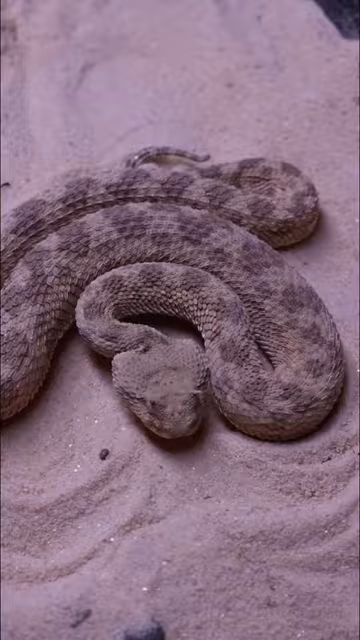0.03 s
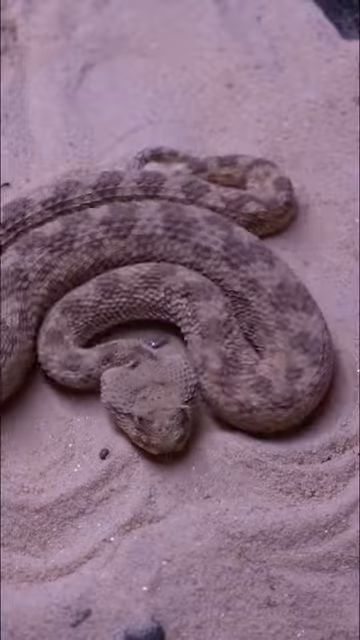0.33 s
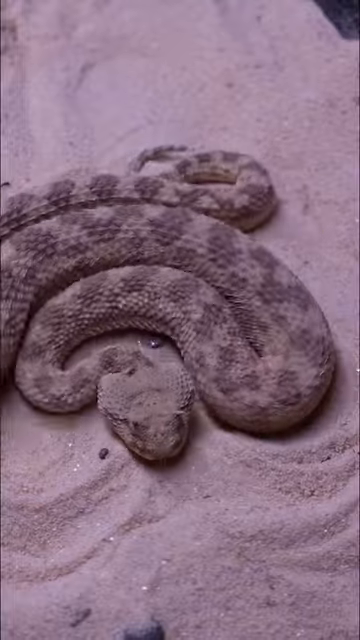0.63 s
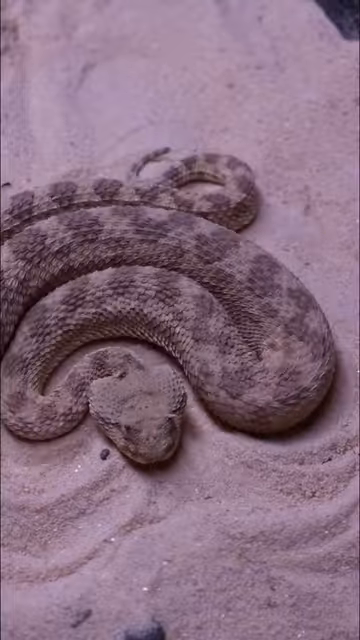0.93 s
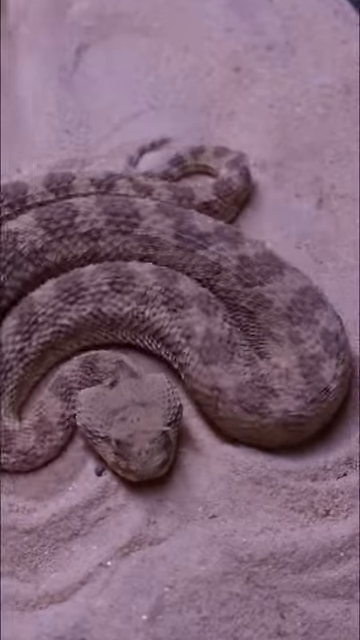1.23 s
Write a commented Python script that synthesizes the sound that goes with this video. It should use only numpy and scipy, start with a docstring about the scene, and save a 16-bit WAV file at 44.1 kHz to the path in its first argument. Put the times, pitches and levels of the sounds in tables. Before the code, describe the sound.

Very close, a snake's scales scrape against each other in a steady dry sizzle. It softens, a small bump sounds, and later the rubbing suddenly grows louder. The small enclosure rings slightly, with a faint low hum underneath.

```python
"""A bright sizzle and a rasp, very close: a viper on sand rubs its coils together in a small enclosure.
Its ridged scales catch on each other thousands of times a second, and these tiny clicks make the
hollow of the enclosure ring. The rubbing eases off, then picks up sharply near the three-second mark.
Underneath lie a few soft bumps, one dull scuff of a coil, a faint mains hum and low room noise."""
import sys
import numpy as np
from scipy import signal
from scipy.fft import rfft, irfft
from scipy.io import wavfile
from scipy.ndimage import uniform_filter1d

SR = 44100
rng = np.random.default_rng(int(sys.argv[2]) if len(sys.argv) > 2 else 0)


def pcm_store(signal):
    """Save signal as 16-bit PCM."""
    levels = np.round(np.clip(np.atleast_2d(signal), -1, 1) * 32767)
    wavfile.write(sys.argv[1], SR, levels.astype(np.int16).T)


N = 176400

# How hard the snake rubs: time_s, sizzle_db, rasp_db, hollow_db
RUB_EFFORT = [(0.04, -29, -35, -27.5), (0.3, -29, -36.5, -29.3), (0.46, -32, -36.5, -29),
              (0.8, -32.5, -38.5, -30), (1.15, -31.5, -37, -31.5), (1.32, -32, -39, -31.5),
              (1.5, -36, -38.5, -32), (2.05, -36.3, -39.5, -35), (2.4, -35.5, -40, -36),
              (2.81, -35.5, -39.5, -33.5), (2.98, -24.5, -33, -27.5), (3.2, -27.5, -35, -28.5),
              (3.42, -26.5, -33.5, -29), (3.86, -23.5, -31, -26), (4.0, -25.5, -31.5, -27.3)]
# How much the higher ringing stands out: time_s, level_db
HIGH_RING_LEVELS = [(0.04, -46), (0.1, -38.5), (0.2, -43.5), (0.32, -42), (0.45, -51), (0.72, -44.5),
                    (0.95, -55.5), (2.8, -48), (3.1, -42.5), (3.44, -36), (4.0, -35.5)]
JUDDER_HZ, JUDDER_DB, SWAY_HZ, SWAY_DB = 88, 0.51, 6.6, 0.5  # fast and slow wobble of the grip


def rubbing_coils(t):
    """Sliding coils sizzle, rasp and ring the enclosure; one uneven grip shakes all their levels."""
    times, *levels = np.array(RUB_EFFORT).T
    sizzle_gain, rasp_gain, hollow_gain = (undb(np.interp(t, times, db)) for db in levels)
    high_gain = undb(np.interp(t, *np.array(HIGH_RING_LEVELS).T))
    grip = undb(JUDDER_DB * wobble(JUDDER_HZ) + SWAY_DB * wobble(SWAY_HZ))
    scraping = sizzle(t) * sizzle_gain + rasp(high_gain) * rasp_gain
    ringing = hollow_ring(t) * hollow_gain + high_ring() * high_gain + boom() * rasp_gain
    return grip * (scraping + ringing)


def catches(per_second=10000, spread_db=2):
    """Two streams of random clicks, one click each time a scale catches."""
    hits = rng.random((2, N)) < per_second / SR
    direction = np.sign(rng.standard_normal((2, N)))
    strength = undb(spread_db * rng.standard_normal((2, N)))
    return unit(hits * direction * strength)


# The tone of the sizzle: pitch_hz, level_db
SIZZLE_TONE = [(4000, -23.5), (6500, -10.5), (8000, -10), (10100, -5.5), (10900, -2.5), (11400, 0),
               (11950, -1), (12300, -6), (12700, 1), (13700, -4), (14800, -22), (15800, -42)]


def sizzle(t):
    """The bright side of the clicks; it drifts left as the rubbing spot moves."""
    clicks = wall_echoes(stereo(catches(), likeness=0.18), level_db=-5.5)
    return shape_tone(clicks, SIZZLE_TONE) * undb(1.5) * pan(0.9 + 0.4 * t)


# The tone of the rasp: pitch_hz, level_db
RASP_TONE = [(100, -25), (180, -18), (260, -7.5), (340, 7), (480, 2), (560, 1.5), (900, 5.5), (1350, 4.5),
             (1680, 1.5), (2350, 1.5), (2650, -1.5), (2950, 2.5), (4000, -1.5), (4700, -0.5), (6400, -2),
             (9000, -3), (14000, -3.5)]


def rasp(high_gain):
    """The lower, rougher side of the clicks; a dip in its treble deepens as the high ringing grows."""
    clicks = wall_echoes(stereo(catches(), likeness=0.67), level_db=-3.5)
    rough = shape_tone(clicks, RASP_TONE) * undb(3.5)
    dip_depth = 0.6 * np.sqrt(high_gain / high_gain.max())
    return rough - dip_depth * ring(rough, hz=3030, width_hz=990)


# The enclosure's notes: pitch_hz, base_width_hz, level_db, likeness (of left and right, -1 to 1)
HOLLOW_NOTES = [(674.3, 58, -1, 1), (743.8, 35.3, 1, 0.92), (793, 110, -9.5, 0.97), (908.4, 50, -5.5, 0.58),
                (1001, 47, -8.5, 0.8), (1076, 47, -5, 0.66), (1233, 35, -9, 0.3), (1544, 30, -15, -0.79)]
# Brief swells of the hollow ringing: peak_s, half_length_s, rise_db
RING_SWELLS = [(0.401, 0.014, 4), (0.714, .02, 4.5), (0.96, 0.0099, 7.5), (1.101, 0.0065, 8),
               (1.144, 0.012, 4.5), (2.883, 0.012, 6), (2.96, 0.019, 1.5), (3.138, .014, 5.5)]


def hollow_ring(t):
    """The clicks ring the hollow of the enclosure; now and then the ringing swells briefly."""
    notes = sum(undb(db) * ringing_note(hz, base_width * 1.55, likeness)
                for hz, base_width, db, likeness in HOLLOW_NOTES)
    swell_db = sum(db * np.exp(-((t - peak) / half) ** 2) for peak, half, db in RING_SWELLS)
    return unit(notes) * undb(swell_db)


# The enclosure's higher notes: pitch_hz, width_hz, level_db, likeness
HIGH_NOTES = [(1895, 168, -0.5, 0.2), (2280, 210, -6, -0.37)]


def high_ring():
    """The clicks also ring higher notes, heard when the rubbing is hard."""
    return sum(undb(db) * ringing_note(hz, width, likeness) for hz, width, db, likeness in HIGH_NOTES)


def boom():
    """The clicks faintly ring the enclosure's lowest note."""
    return ringing_note(hz=180, width_hz=64, likeness=0.79) * undb(-21)


def ringing_note(hz, width_hz, likeness):
    """One breathy note, kept ringing by a stream of catches."""
    return unit(ring(stereo(catches(), likeness), hz, width_hz))


def wall_echoes(sound, level_db, first_s=0.0004, decay_s=0.021):
    """Sand and near walls return the sound within milliseconds, differently to each side."""
    age = np.arange(2048) / SR
    scatter = rng.standard_normal((2, len(age))) * np.exp(-age / decay_s) * (age > first_s)
    paths = (age == 0) + undb(level_db) * scatter / np.linalg.norm(scatter, axis=1, keepdims=True)
    return signal.fftconvolve(sound, paths, axes=1)[:, :N]


# Soft bumps: start_s, relative_level_db, contact_s, tick_db (compared with the thud)
SOFT_BUMPS = [(1.015, -7, 0.0011, -30), (1.0557, -1.5, 0.0013, -1), (1.0585, 4, 0.0007, -4),
              (1.0628, -8, 0.0039, -5), (2.1975, -8, 0.002, -30), (2.662, -17, 0.0019, -30)]
# The notes a bump rings: pitch_hz, fade_s (time to fall 60 dB), level_db
THUD_NOTES = [(190, .04, -19), (313, 0.037, -2.5), (510, 0.0058, -3), (700, 0.054, 4), (910, 0.022, 6.5),
              (1610, 0.028, 3), (2700, .03, 13)]
BUMP_DB, THUD_PAN_DB, TICK_DECAY_S = -18, -11, 0.0047


def bumps(t):
    """Soft pushes thud on the right; a shorter contact is brighter, and some add a gritty tick."""
    out = np.zeros((2, N))
    body = sum(undb(db) * np.sin(2 * np.pi * hz * t) * np.exp(-np.log(1000) * t / fade_s)
               for hz, fade_s, db in THUD_NOTES)[:SR // 10]
    body = signal.lfilter(*signal.butter(2, 150, "high", fs=SR), body)  # thin out the deep bass
    for start, db, contact_s, tick_db in SOFT_BUMPS:
        age = np.maximum(t - start, 0)
        push = np.sin(np.pi * np.minimum(age / contact_s, 1))
        thud = signal.fftconvolve(push, body)[:N]
        thud = thud / np.abs(thud).max() * pan(THUD_PAN_DB)
        grit = rng.standard_normal((2, N)) * (t >= start) * np.exp(-age / TICK_DECAY_S)
        tick = ring(grit + 1e-18, hz=1900, width_hz=4400)
        out += undb(BUMP_DB + db) * (thud + undb(tick_db) * tick / np.abs(tick).max())
    return out


def coil_drag(t, peak_s=1.88, half_length_s=0.046):
    """A coil drags heavily over the ground: a dull scuff that swells and fades."""
    swell = np.exp(-((t - peak_s) / half_length_s) ** 2)
    scuff = unit(ring(rng.standard_normal(N), hz=265, width_hz=104))
    return scuff * swell * undb(-38.5) * pan(THUD_PAN_DB)


# The hum of equipment: pitch_hz, width_hz, level_db, likeness, left_minus_right_db
EQUIPMENT_HUM = [(61.6, 19, -56.5, 0.94, -1.5), (176.3, 32, -53, 0.89, -2)]
# The tone of the room noise: pitch_hz, relative_level_db
ROOM_TONE = [(20, -19), (45, -6), (80, 4.5), (105, -12.5), (150, 4.5), (250, -3.5), (340, 0), (600, -21),
             (2000, -12)]
MAINS_HZ, MAINS_DB, MAINS_WAVER_DB = 120.2, -54, 3.5


def room(t):
    """A wavering mains tone and the hum of equipment over low room noise."""
    mains = np.sqrt(2) * np.sin(2 * np.pi * MAINS_HZ * t) * undb(MAINS_DB - MAINS_WAVER_DB * wobble(1.5))
    hum = np.zeros((2, N))
    for hz, width, db, likeness, pan_db in EQUIPMENT_HUM:
        noise = stereo(rng.standard_normal((2, N)), likeness)
        hum += undb(db) * pan(pan_db) * unit(ring(noise, hz, width))
    air = shape_tone(stereo(rng.standard_normal((2, N)), likeness=1), ROOM_TONE) * undb(-48.5)
    return mains + hum + air


def undb(db):
    """Turn decibels into a multiplier."""
    return 10 ** (np.asarray(db) / 20)


def unit(x):
    """Scale to an average strength (rms) of 1."""
    return x / np.sqrt(np.mean(x ** 2))


def wobble(hz):
    """A smooth random wander of size about 1."""
    span = max(int(SR / hz), 1)
    smoothed = uniform_filter1d(rng.standard_normal(N), span, mode="wrap")
    return unit(uniform_filter1d(smoothed, span, mode="wrap"))


def shape_tone(x, points):
    """Filter by a table of pitch_hz, level_db, fading beyond its ends; the result has strength 1."""
    hz, db = np.array(points).T
    freqs = np.maximum(np.arange(N // 2 + 1) * SR / N, 1)
    edge_fade = np.minimum(freqs / hz[0], 1) ** 2 * np.minimum(hz[-1] / freqs, 1) ** 2
    gain = undb(np.interp(np.log(freqs), np.log(hz), db))
    return unit(irfft(rfft(x) * edge_fade * gain, N))


def ring(x, hz, width_hz):
    """Keep the sound near one pitch; filtering twice makes the peak sharper."""
    b, a = signal.iirpeak(hz, hz / width_hz, fs=SR)
    return signal.lfilter(b, a, signal.lfilter(b, a, x))


def stereo(pair, likeness):
    """Mix two unrelated sounds into left and right: likeness 1 is the same, 0 unrelated, -1 opposite."""
    mid = pair[0] * np.sqrt((1 + likeness) / 2)
    side = pair[1] * np.sqrt((1 - likeness) / 2)
    return np.array([mid + side, mid - side])


def pan(db):
    """Left and right gains; positive db leans left."""
    return undb(db * np.array([[1], [-1]]) / 2)


def scene():
    """The snake, the room, the bumps and the scuff together."""
    t = np.arange(N) / SR
    return rubbing_coils(t) + room(t) + bumps(t) + coil_drag(t)


def record(dry, start_s=0.036, top_hz=15500):
    """The microphone opens after a moment and cuts the highest treble."""
    opened = np.arange(N) / SR >= start_s
    return signal.sosfilt(signal.ellip(8, .2, 70, top_hz, fs=SR, output="sos"), dry * opened)


dry = scene()
out = record(dry)
pcm_store(out)
```